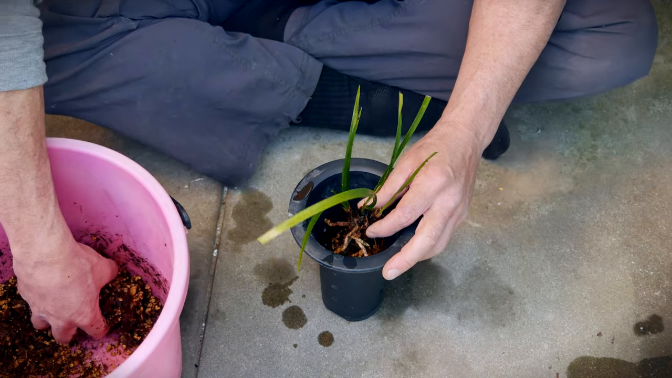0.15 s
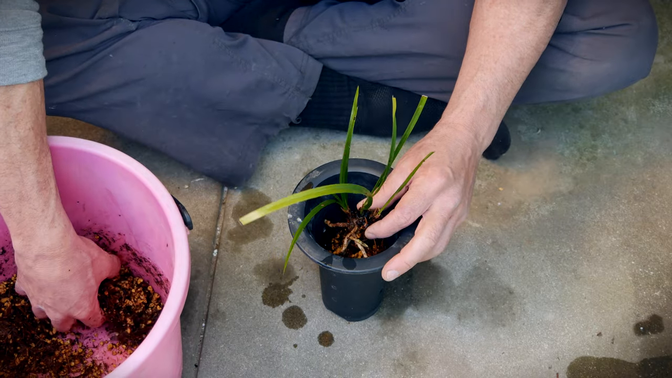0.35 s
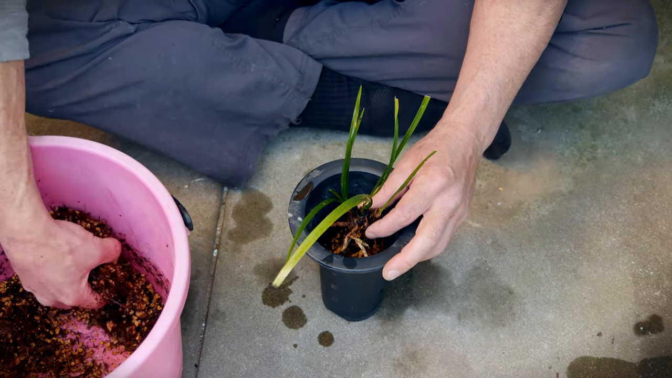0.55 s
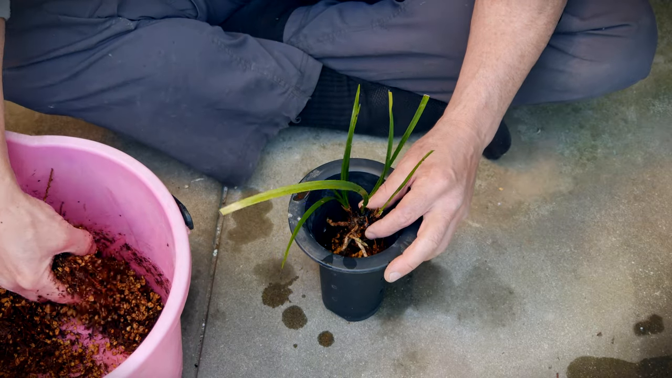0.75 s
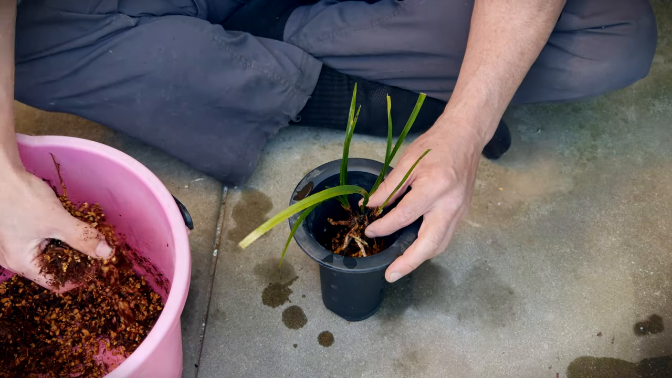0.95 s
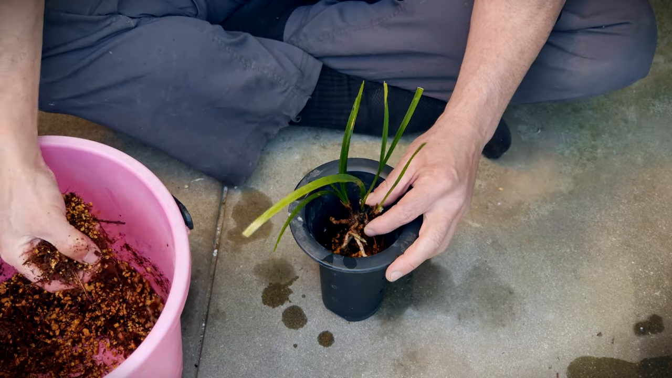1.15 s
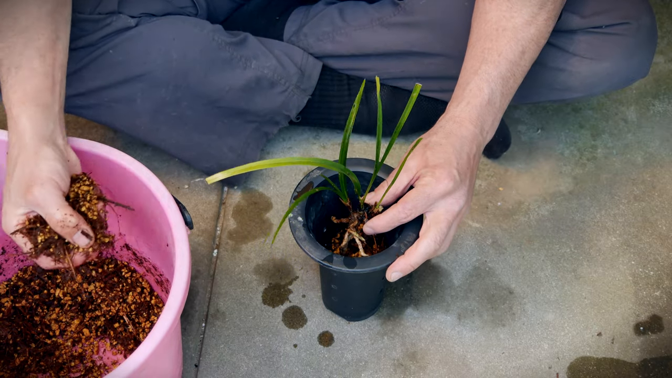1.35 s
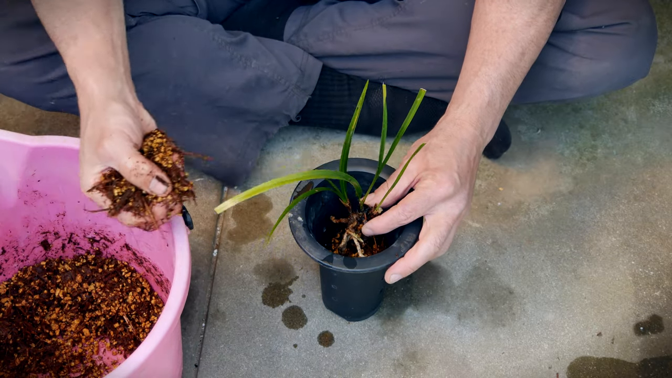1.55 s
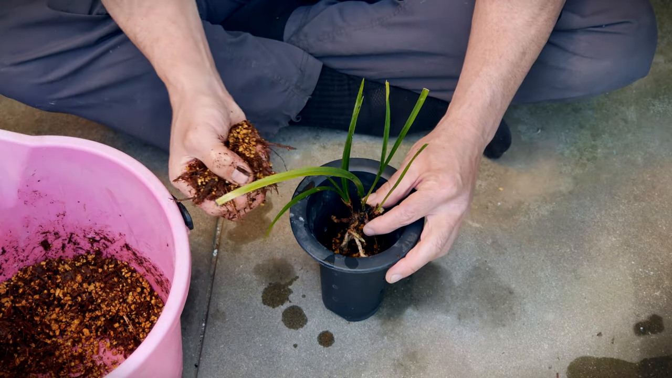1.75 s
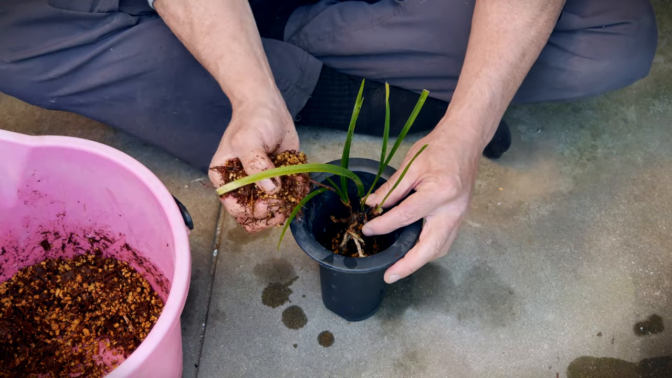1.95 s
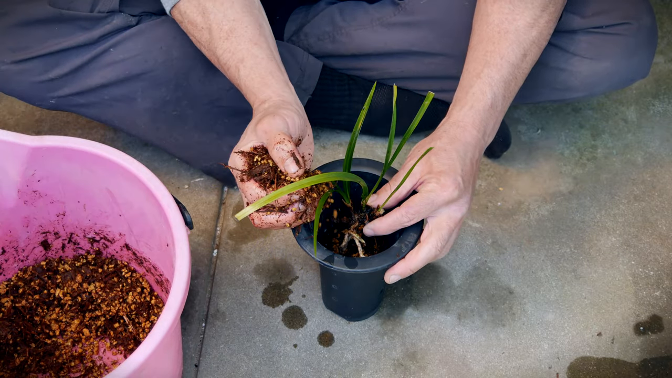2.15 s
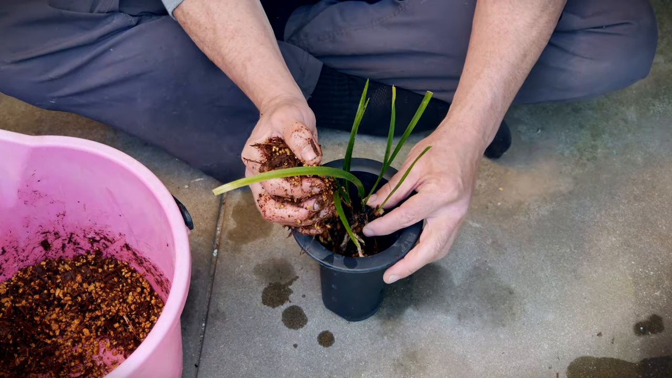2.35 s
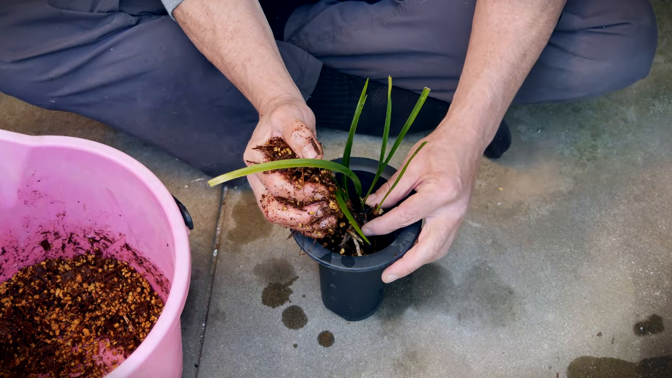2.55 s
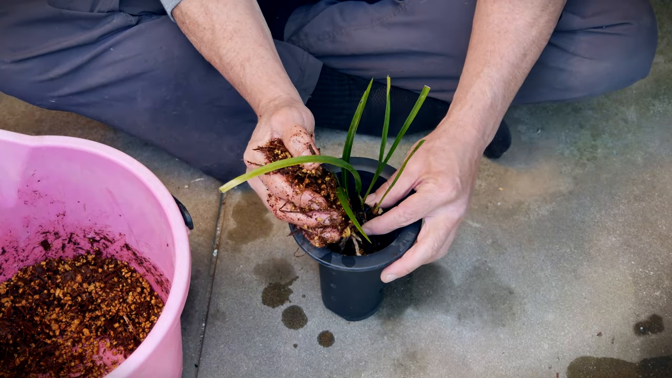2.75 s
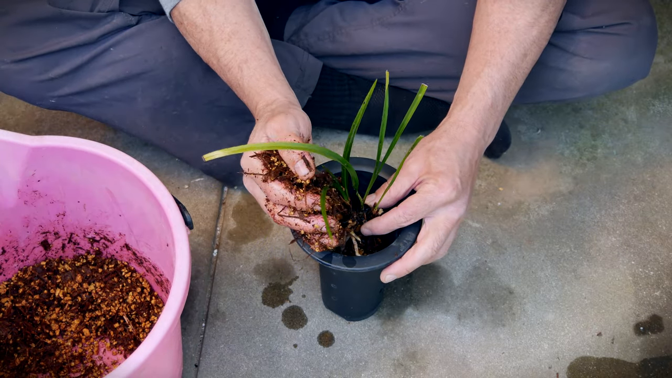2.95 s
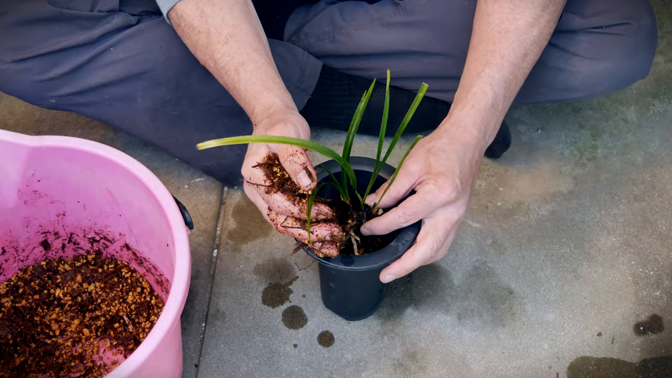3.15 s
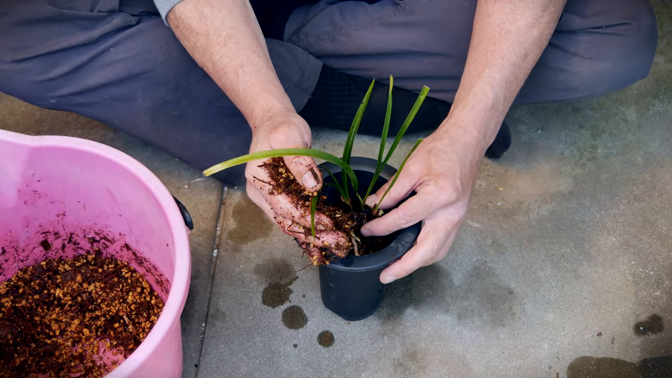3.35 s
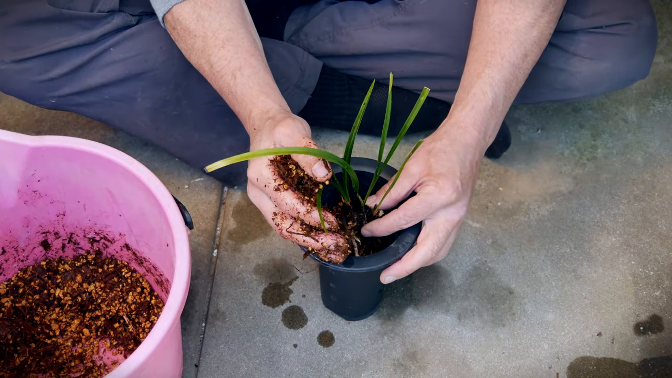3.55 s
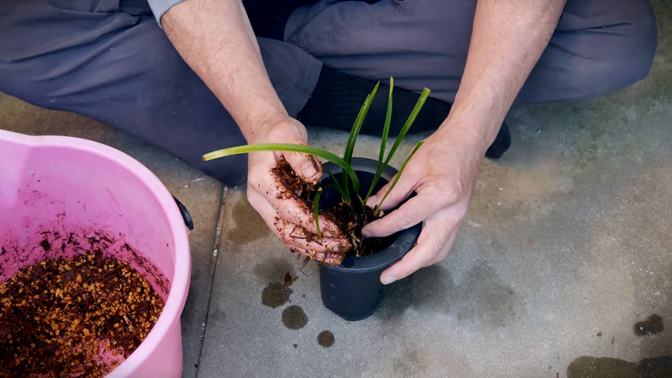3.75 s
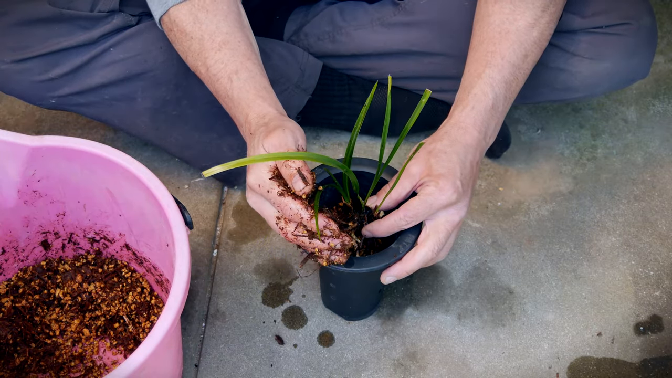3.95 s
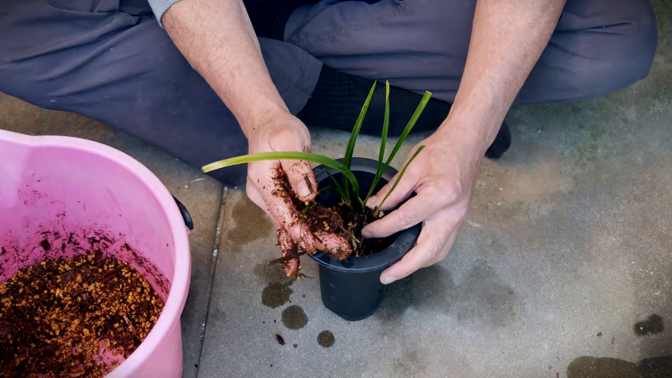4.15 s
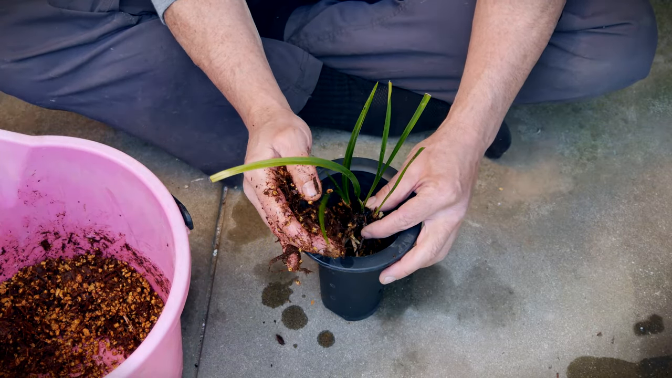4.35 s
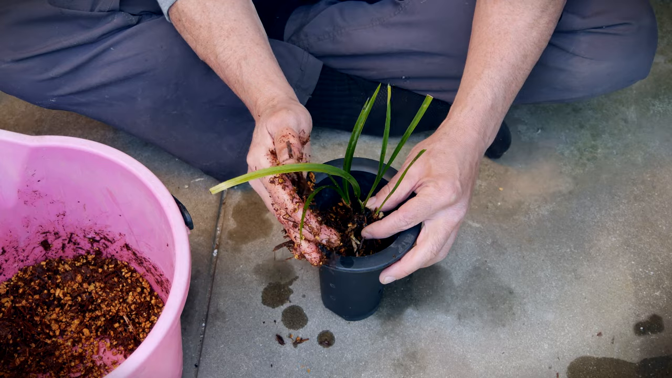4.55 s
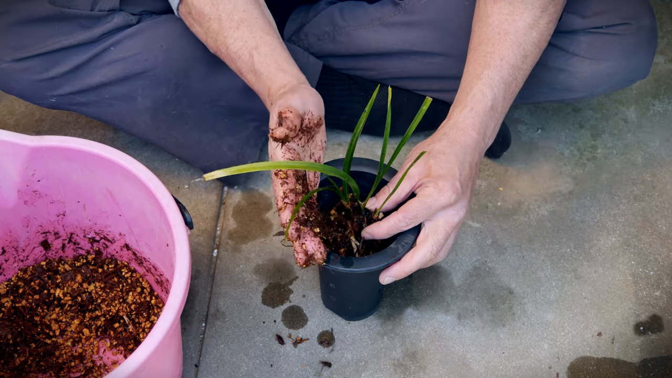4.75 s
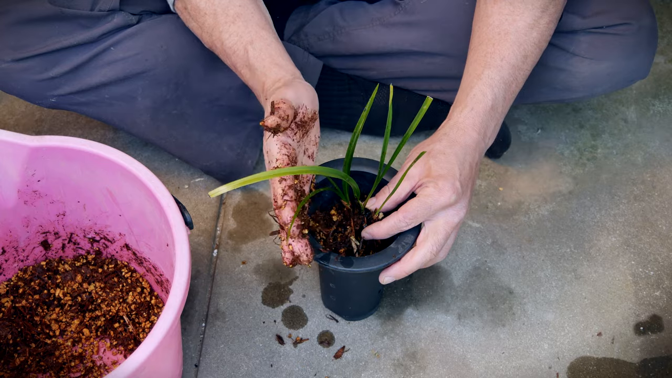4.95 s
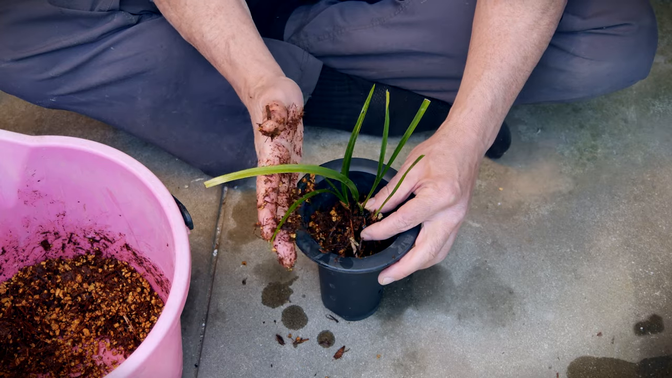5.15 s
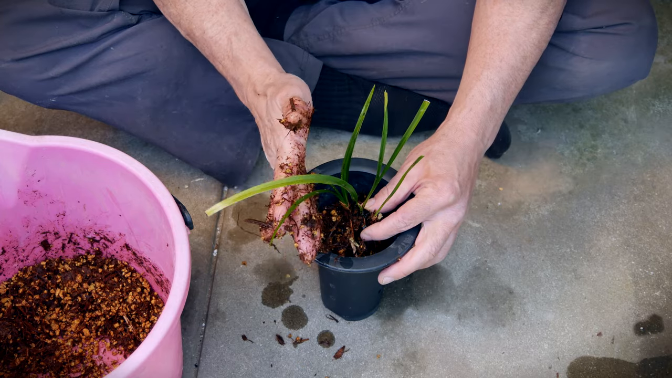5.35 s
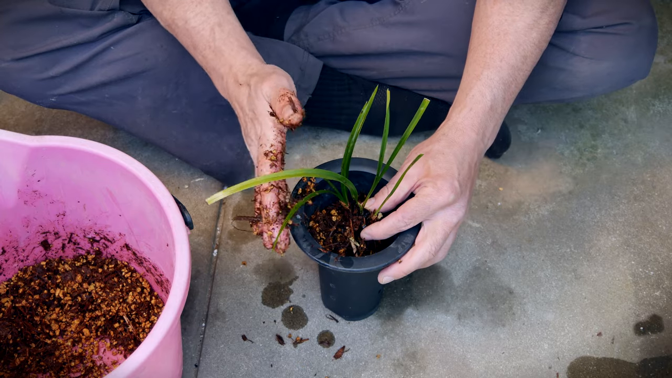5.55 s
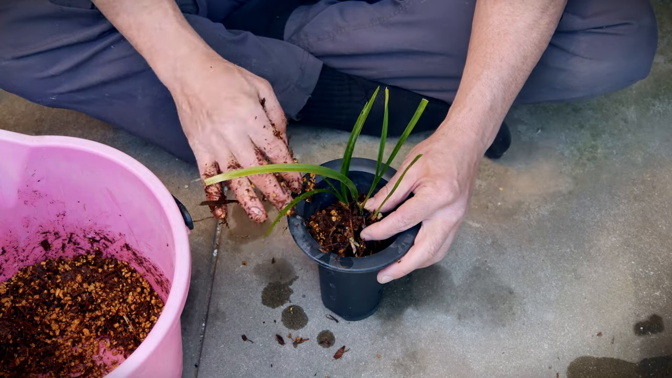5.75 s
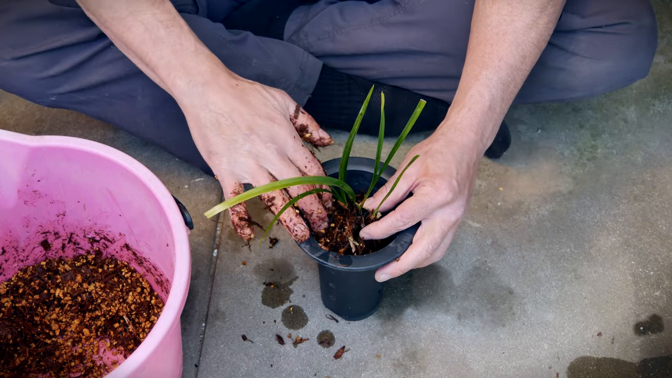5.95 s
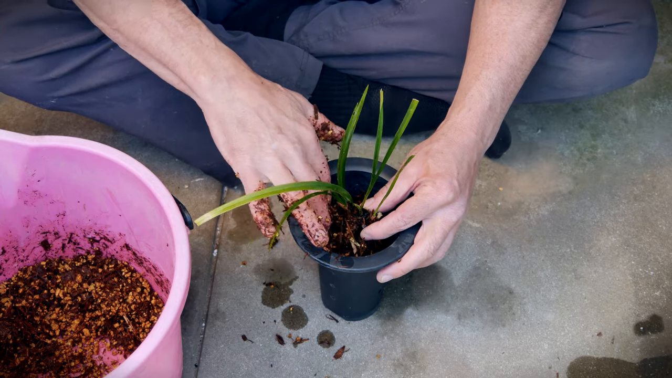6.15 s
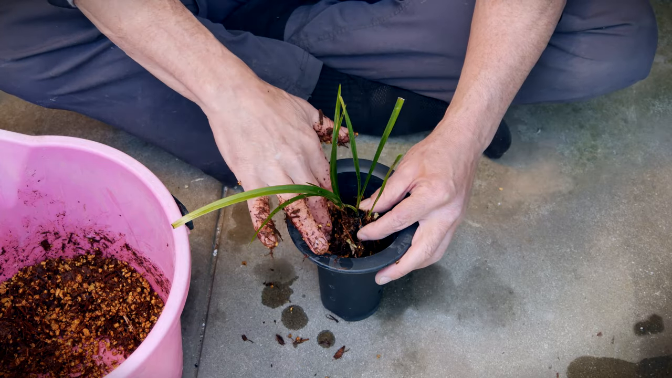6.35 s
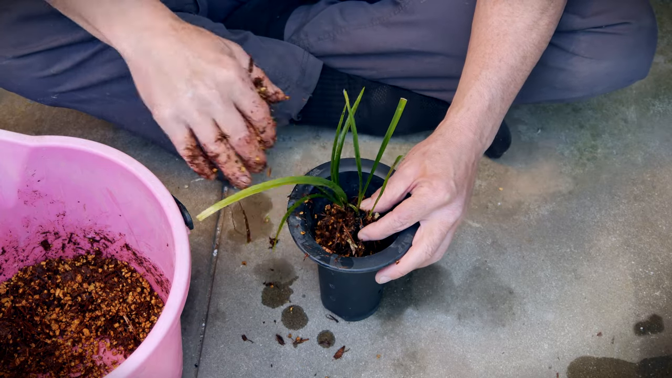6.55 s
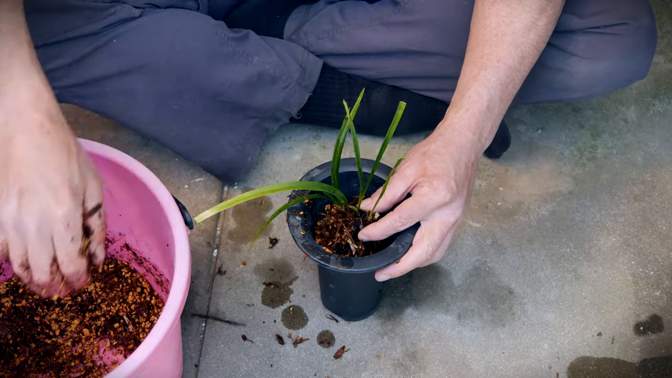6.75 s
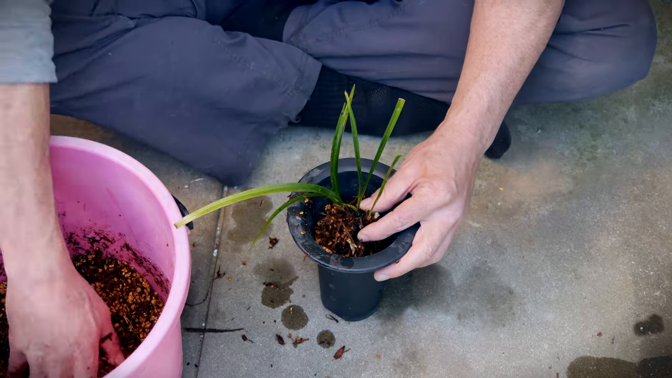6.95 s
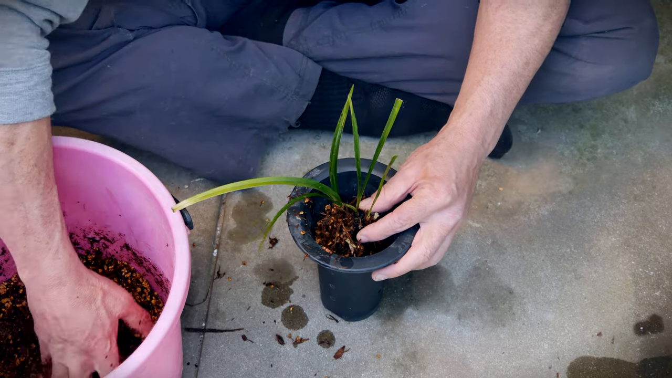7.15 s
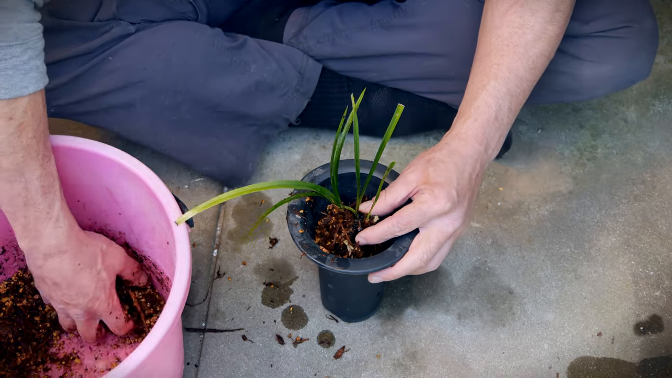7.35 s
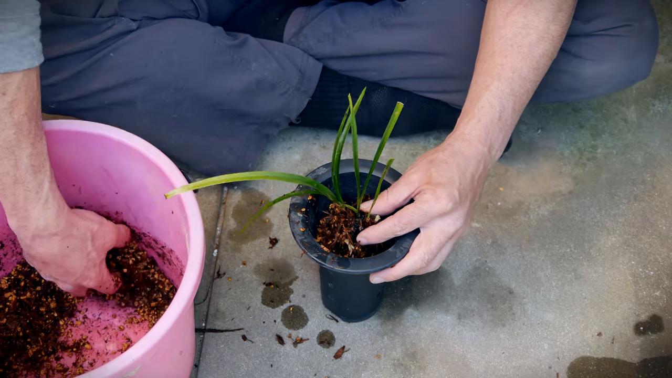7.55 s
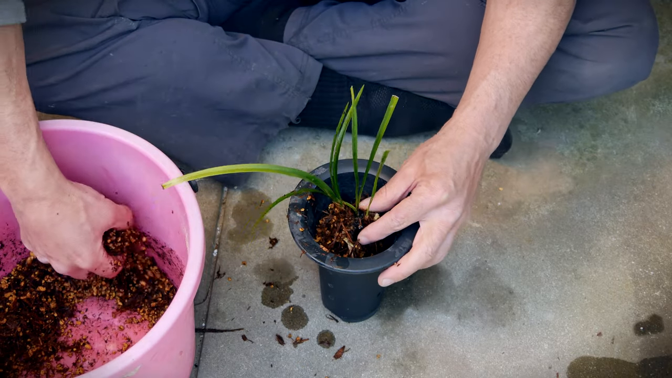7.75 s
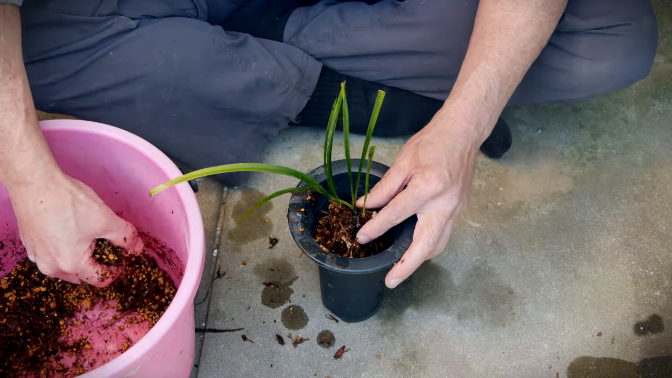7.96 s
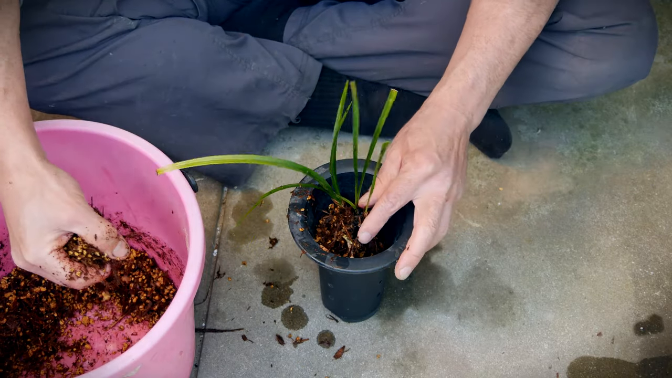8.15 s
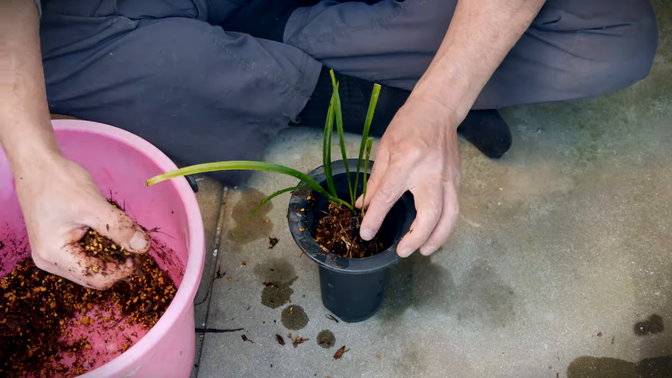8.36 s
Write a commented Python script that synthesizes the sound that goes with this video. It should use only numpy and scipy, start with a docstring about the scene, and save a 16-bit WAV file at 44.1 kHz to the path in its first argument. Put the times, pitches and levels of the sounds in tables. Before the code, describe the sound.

On an outdoor patio, heard closely in stereo, a hand digs in coarse potting mix in a plastic tub to the left. From 0 to about 1.6 seconds, short gritty pushes grind the grains, single pieces tick on plastic, and the wall gives small hollow knocks. From about 1.8, dry bark chips crackle brightly at a small pot in the centre, busiest between 2.3 and 3.3, with a sharp snap near 2.85. Two very faint, soft coos sound far off around 1.9 and 2.4. The crumbling thins to sparse ticks until 5.4. Between 5.7 and 6.5, soft leafy sweeps and a slight rim scuff pass. Around 7 the hand digs again, louder, with crunching scrapes and a strong hollow drum near 7.3, then smaller grinding pushes and rattles to 8.4. Faint low rumble and air continue throughout.

```python
"""Scooping potting mix into a small pot

Coarse mix is scooped by hand from a plastic tub and crumbled into a small pot, outdoors. Fingers push
through the grains, which rattle on the tub and make its wall drum; bark chips crackle at the pot. The hand
brushes past leaves, then digs again. Underneath lie a faint outdoor rumble and two far-off coos.
Clicks and noise, coloured by filters, make the grains and leaves; decaying sines make the wall."""
import sys
import numpy as np
from scipy import signal
from scipy.io import wavfile
from scipy.ndimage import uniform_filter1d

SR = 44100
rng = np.random.default_rng(int(sys.argv[2]) if len(sys.argv) > 2 else 0)


def wrap_up_sound(samples):
    """Save the sound to the file named by the first command line argument, as 16-bit audio."""
    columns = np.atleast_2d(samples).T
    # keep every value between -1 and 1, then stretch to whole-number steps
    tamed = np.clip(columns, -1, 1)
    steps = np.round(tamed * 32767).astype(np.int16)
    wavfile.write(sys.argv[1], SR, steps)


N = 370440
TIME = np.arange(N) / SR

FILTER_SIZE = 2048  # samples in a colouring filter and in a single grain
HZ = np.fft.rfftfreq(FILTER_SIZE, 1 / SR)
SPLIT_HZ = 4500  # where body ends and treble begins
CRISP_S = .0024  # how fast a grain's treble chatter dies

# The loudest single grains striking the tub.
# Each row: start in seconds, relative level in dB, ring in Hz, treble over body in dB.
TUB_GRAINS = [(0.0088, -43, 1370, -31), (0.0633, -47.5, 2110, 2), (0.1428, -44, 2130, -8),
              (0.1731, -30, 1970, -8), (0.185, -34, 1330, 1), (0.2106, -38, 1310, -10),
              (0.3062, -37.5, 1440, -7.5), (0.3759, -51, 3200, 17), (0.388, -48, 1420, 15),
              (0.4174, -41.5, 1900, -7), (0.5005, -45, 1850, -33), (0.6609, -46.5, 1260, -16),
              (0.7877, -51, 1690, -2), (0.8242, -32.5, 1380, -7.5), (0.8513, -43, 1430, -9),
              (0.92, -44, 1840, -30), (1.0061, -32, 1600, -27), (1.0412, -37, 1466, -3.5),
              (1.0718, -36.5, 1620, -11), (1.1068, -34, 1750, -15), (1.1169, -33.5, 3140, -9.5),
              (1.1569, -42, 1510, -7), (1.1883, -40, 2050, -3), (1.2042, -41, 1990, -5),
              (1.2449, -36.5, 2530, -12.5), (1.2964, -51.5, 2050, -6), (1.3859, -37.5, 1450, -21),
              (1.4606, -34.5, 1430, 0.5), (1.4711, -32, 2120, -5), (1.5953, -49, 2470, -4),
              (6.9963, -41, 1550, -25), (7.0491, -40, 3100, -2), (7.1214, -37.5, 1220, -29),
              (7.1365, -32.5, 2150, -8.5), (7.3404, -32.5, 1320, -36), (7.4034, -37, 1960, 1),
              (7.463, -40, 1260, -5), (7.4905, -30, 3180, -6), (7.494, -31, 1470, 0),
              (7.5599, -37, 1390, -8), (7.6328, -40.5, 1490, 0), (7.747, -43.5, 1730, -63),
              (7.8829, -49.5, 1574, -9), (7.9861, -49, 1720, -8), (8.0178, -47, 1370, -15),
              (8.0278, -32, 1420, -7.5), (8.1703, -32.5, 2060, -10.5), (8.2763, -30.5, 2140, -8),
              (8.3735, -40.5, 1570, -52)]
# The spectrum of grains on the tub. Each row: frequency in Hz, relative level in dB per Hz.
GRAIN = [(100, -30.5), (400, -7), (700, -3), (1100, -4), (1800, -2.5), (3000, -3.5), (4500, -7),
         (7000, -8.5), (10500, -7.5), (13000, -14.5), (16000, -25)]
# The tub stands to the left. Each row: frequency in Hz, left minus right in dB.
TUB_SIDE = [(100, 3.5), (300, 3), (700, 2.5), (2400, 4), (4400, 5.5), (8000, -0.5), (15000, 2)]
# How the hollow of the tub colours the grains in each scoop; it changes as the tub empties.
# Each row: frequency in Hz, width in Hz, boost in dB.
FIRST_HOLLOW = [(890, 180, 11), (1440, 150, 6), (1714, 110, 7.5), (1980, 93, 7), (3300, 500, -1)]
SECOND_HOLLOW = [(800, 500, 7.8), (1361, 470, 8.7), (2040, 130, 6), (2740, 93, 1.5), (3200, 150, 4.3)]
# Pushes of the fingers through the mix in the tub. Each row: start in seconds, hold in seconds,
# relative level in dB, treble over body in dB before trims, relative wall drumming in dB.
PUSHES = [(0.181, .028, -39.5, -8.5, -37), (0.232, 0.024, -48, -7, -62), (0.313, .018, -50.5, -9, -47),
          (0.418, .025, -40.5, -15, -44), (0.465, 0.061, -46, -29, -54), (0.543, 0.041, -42.5, -16, -51),
          (0.676, 0.017, -51.5, -18.5, -56), (0.745, 0.037, -56, -11, -54), (0.823, 0.1, -50.5, -17.5, -49),
          (1.065, .135, -42.5, -15, -53), (1.251, .025, -49, -13, -68), (1.348, 0.082, -61.5, -3.5, -70),
          (1.476, 0.014, -47, -8.5, -68), (7.06, 0.038, -44, -11, -38.5), (7.151, .185, -33.5, -12, -30.5),
          (7.384, 0.062, -39.5, -11, -38.5), (7.452, 0.12, -32.5, -11.5, -31), (7.61, .012, -45, -11, -48),
          (7.68, 0.06, -50.5, -21, -65), (7.839, 0.09, -53.5, -21, -57), (7.989, .125, -46, -22, -55),
          (8.186, 0.043, -52.5, -10, -70), (8.3, .04, -58, -6.5, -70)]
RETURN_S = 6.9  # the hand is back in the tub for its second scoop


def tub():
    """Everything that sounds in the tub, heard from the left: single grains, two scoops and the wall."""
    spot_db = read(GRAIN)
    spot_db = spot_db + bump(hz=1413, width_hz=160, db=6) + bump(hz=14000, width_hz=3000, db=-3.5)
    loose = strays([push[:4] for push in PUSHES], per_s=22, settle_s=.015, over_db=-2,
                   spread_db=5, low_hz=1280, high_hz=2180)
    rattle = strikes(TUB_GRAINS + loose, spot_db, chatter_s=0.0044, crisp_s=CRISP_S, snap=0.55,
                     ring_db=11.0, ring_width=0.27, dulling=0.25, heft=0.65)
    x = gain_of(-7.5) * rattle

    first = [push for push in PUSHES if push[0] < RETURN_S]
    second = [push for push in PUSHES if push[0] >= RETURN_S]
    x += clumps(depth_db=1.8, size=500) * scoop(
        first, FIRST_HOLLOW, per_s=2100, spread_db=4.5, rustle=0.63,
        patchy_db=3.0, body_db=-2.5, treble_db=-1)
    x += scoop(second, SECOND_HOLLOW, per_s=1700, spread_db=4, rustle=.45,
               patchy_db=1.5, body_db=-3.5, treble_db=-1.0)
    x += wall(drag_db=-7, thud_hz=104.5, thud_t60=0.031, favour_db=13, build_s=0.0023)

    left = colour(x[0], read(TUB_SIDE) / 2)
    right = colour(x[1], -read(TUB_SIDE) / 2)
    return np.array([left, right])


# Time for a push to build and to die by 20 dB (s); it grows harder as it goes (dB).
PUSH_ATTACK_S, PUSH_RELEASE_S, PUSH_SWELL_DB = 0.037, 0.056, 0.5


def scoop(rows, hollow, per_s, spread_db, rustle, patchy_db, body_db, treble_db):
    """Grains grind in the hollow of the tub: muffled deep in the mix, bright on bare plastic."""
    start, hold, db, bright_db, _ = np.transpose(rows)
    hollow_db = read(GRAIN) + sum(bump(*mode) for mode in hollow)
    body, treble = body_and_treble(grains(per_s, spread_db, rustle), hollow_db)
    # pushes with little treble lose some upper body too
    tilt = np.c_[start + hold / 2, .7 * np.minimum(bright_db + 11, 0)]
    body = shifting(body, patchy_db, tilt)
    shape = PUSH_ATTACK_S, PUSH_RELEASE_S, PUSH_SWELL_DB
    body_level = level(np.c_[start, hold, db + body_db], *shape)
    treble_level = level(np.c_[start, hold, db + bright_db + treble_db], *shape)
    return body * body_level + treble * treble_level


# Knuckles and lumps bumping the tub. Each row: start in seconds, wall ring in dB,
# frequency this spot favours in Hz, thud on the ground in dB.
KNOCKS = [(0.173, -33, 445, -55), (0.191, -33, 470, -55), (.206, -28.5, 426, -48), (0.217, -51, 300, -40),
          (0.306, -32.5, 950, -50), (0.32, -47, 400, -25), (.661, -34.5, 715, -55),
          (1.009, -36.5, 433, -50), (7.044, -31, 900, -35), (7.0471, -28.5, 330, -13.5),
          (7.092, -32.5, 300, -20), (7.2583, -24, 300, -53), (7.287, -16, 304, -34),
          (7.339, -28.5, 950, -55), (7.974, -45, 430, -29)]
# The ways the tub's wall can ring.
# Each row: frequency in Hz, relative level in dB, time to die by 60 dB in seconds.
WALL = [(308.5, -5.5, 0.086), (334, -11, 0.072), (424, -0.5, 0.037), (450, -4.5, 0.022), (605, 2, 0.021),
        (739, -17, 0.11), (895, -8.5, 0.047), (1124, -17, 0.063), (1206, -14, 0.033)]


def wall(drag_db, thud_hz, thud_t60, favour_db, build_s):
    """The tub's wall rings under dragged grains and knuckles; a hard bump also thuds on the ground."""
    t = np.arange(SR // 4) / SR
    onset = 1 - np.exp(-t / build_s)  # flesh makes a soft contact

    def ring(spot_hz):
        """Modes near the one that the spot favours ring most."""
        modes = np.zeros(len(t))
        for hz, db, t60 in WALL:
            mode_db = db - favour_db * abs(np.log2(hz / spot_hz)) - 60 * t / t60
            modes += gain_of(mode_db) * np.sin(2 * np.pi * hz * t)
        modes *= onset
        return modes / abs(modes).max()

    drumming = [(start, hold, drum_db) for start, hold, *_, drum_db in PUSHES]
    pressure = level(drumming, attack_s=0.029, release_s=0.031, swell_db=-1.5)
    drag = grains(per_s=820, spread_db=2.0, rustle=0.52)[0] * pressure
    base = ring(spot_hz=348)
    drummed = signal.oaconvolve(drag, base / np.linalg.norm(base))[:N]
    out = np.tile(gain_of(drag_db) * drummed, (2, 1))

    thud = onset * gain_of(-60 * t / thud_t60) * np.sin(2 * np.pi * thud_hz * t)
    for s, ring_db, spot_hz, thud_db in KNOCKS:
        add(out, s, gain_of(ring_db) * ring(spot_hz) + gain_of(thud_db) * thud)
    return out


# The loudest chips snapping and dropping at the pot.
# Each row: start in seconds, relative level in dB, ring in Hz, treble over body in dB.
CRACKS = [(2.0498, -50.5, 2600, -6), (2.0988, -43.5, 4180, 8), (2.2878, -43, 7160, 5.5),
          (2.3483, -43.1, 2170, -3), (2.3709, -45, 9260, 10), (2.4062, -42.5, 2300, -1),
          (2.4295, -47.9, 2580, 2), (2.5363, -40, 7200, 9), (2.599, -45, 7520, 4), (2.6154, -39, 8150, 6),
          (2.6541, -34, 2530, 0), (2.6687, -40, 7150, 10), (2.7323, -50, 4220, 7), (2.7524, -47.5, 2780, 2),
          (2.8058, -40, 7100, 9), (2.8481, -45, 5940, 12), (2.8512, -29.5, 5900, 1.5),
          (2.8903, -41.5, 4520, 8), (2.9725, -46.5, 6800, 12), (3.0199, -48.5, 2930, 0),
          (3.0662, -41, 7300, 13), (3.0948, -49, 2890, 5), (3.1317, -41.5, 4670, 14),
          (3.2396, -45, 7320, 6), (3.2616, -41.5, 7700, 11), (3.411, -53.5, 6420, 10),
          (3.4615, -53.5, 3190, -12), (3.746, -48, 3810, -22), (3.8332, -47, 2710, -4),
          (3.9445, -45, 3470, -10), (4.0791, -56, 3320, -2), (4.2841, -52, 2050, 0),
          (4.4626, -54.5, 4890, 7), (4.5728, -46.5, 2590, 2), (4.7091, -53.5, 5170, 6),
          (4.7523, -48, 7800, 27), (4.8371, -54.5, 7650, 17), (5.4062, -35.5, 6500, 8.5),
          (6.4119, -53, 3660, 3), (6.5209, -59, 2480, -20), (6.7345, -56, 2000, 0)]
# The spectrum of dry chips. Each row: frequency in Hz, relative level in dB per Hz.
CHIP = [(200, -23), (900, -6.5), (1900, -7), (2600, 0.5), (4000, -1), (5500, -3.5), (7500, -2.5),
        (10000, -7), (13000, -14), (16000, -23.5)]
# Spills of mix as the fingers loosen. Each row: start in seconds, hold in seconds, relative level in dB.
SPILLS = [(1.77, 0.038, -68), (2.315, .08, -60), (2.549, .135, -56), (2.745, .05, -67), (2.979, 0.098, -57),
          (3.224, 0.024, -53.5), (3.409, 0.036, -65.5), (3.52, 0.026, -68.5), (3.698, 0.017, -63),
          (3.749, .025, -57.5), (4.05, .03, -68), (4.331, 0.1, -69.5), (4.738, .03, -73), (4.94, .012, -70),
          (5.23, .1, -75)]
SPILL_ATTACK_S, SPILL_RELEASE_S = 0.091, 0.08  # time for a spill to build and to die by 20 dB
CHIP_TREBLE_DB = 1  # treble over body of the small chips in a spill


def pot():
    """Dry chips crackle out of the hand and land in the pot, each with a colour of its own."""
    loose = strays([(*spill, CHIP_TREBLE_DB) for spill in SPILLS], per_s=32, settle_s=.012, over_db=7.5,
                   spread_db=2.5, low_hz=2500, high_hz=8000)
    cracks = strikes(CRACKS + loose, read(CHIP), chatter_s=0.0032, crisp_s=CRISP_S, snap=0.26,
                     ring_db=7.5, ring_width=0.1, dulling=0.22, heft=1.3)
    crumbs = evened(ports(grains(per_s=380, spread_db=5, rustle=.3), read(CHIP)))
    flow = level(SPILLS, SPILL_ATTACK_S, SPILL_RELEASE_S, swell_db=3.0)
    crumbs = shifting(crumbs, patchy_db=3, size=5, order=10)
    crumbs = crumbs * flow * clumps(depth_db=1.5, size=400)
    return gain_of(-8) * cracks + gain_of(1.0) * crumbs


# Spectra of leaves and of the pot's rim. Each row: frequency in Hz, relative level in dB per Hz.
LEAF = [(300, -7), (850, 6), (1500, -6.5), (2100, -3.5), (2700, 3), (4000, 1.5), (5000, -4), (6500, -1.5),
        (7300, -2.5), (8300, -5), (11000, -5.5), (15500, -16)]
RIM = [(300, -15), (600, -9), (850, 6), (1250, -7), (1750, -5), (2400, -5), (6000, -27)]
# Sweeps of hand and sleeve past the leaves, and fingers scuffing the rim of the pot meanwhile.
# Each row: start in seconds, hold in seconds, relative level in dB.
SWEEPS = [(5.69, 0.24, -56.5), (5.97, .1, -50), (6.17, 0.014, -53.5), (6.265, 0.045, -47),
          (6.41, 0.048, -62.5)]
SCUFFS = [(5.84, 0.029, -51.5), (5.97, 0.0081, -52)]


def brush():
    """Soft sliding friction: contacts so dense that they merge into a hiss; coarser on the rim."""
    hiss = evened(ports(grains(per_s=3000, spread_db=7.0, rustle=1.4), read(LEAF)))
    scuff = evened(ports(grains(per_s=280, spread_db=1.5, rustle=0.47), read(RIM)))
    sliding = level(SWEEPS, attack_s=0.05, release_s=0.051, swell_db=1.5)
    leaves = gain_of(-0.5) * shifting(hiss, patchy_db=1.4, size=90, order=3) * sliding
    return leaves + scuff * level(SCUFFS, attack_s=0.03, release_s=0.022)


def strikes(rows, spectrum_db, chatter_s, crisp_s, snap, ring_db, ring_width, dulling, heft):
    """Each grain hits once, chatters for a few milliseconds, and rings the spot it lands on."""
    out, t = np.zeros((2, N)), np.arange(FILTER_SIZE) / SR
    top_octaves = np.log2(np.maximum(HZ / 9000, 1))

    def contact(decay_s):
        """One snap and its dying chatter."""
        drive = rng.standard_normal((2, FILTER_SIZE)) * np.exp(-t / decay_s)
        drive[0, 0] = 0
        drive /= np.linalg.norm(drive, axis=1, keepdims=True)
        drive[0, 0] = snap
        drive[1] *= np.hypot(1, snap)
        return drive

    for s, db, hz, treble_db in rows:
        # a cushioned blow loses its upper body along with its treble
        soft_db = dulling * min(treble_db + 8, 0) * above(HZ, knee_hz=1920)
        # heavy grains stay in contact longer, which takes off the very top; light ones gain some
        heavy_db = -heft * (db + 42.0) * top_octaves
        tone_db = spectrum_db + soft_db + heavy_db + bump(hz, ring_width * hz, ring_db)
        body = body_and_treble(contact(chatter_s), tone_db)[0]
        treble = body_and_treble(contact(crisp_s), tone_db)[1]
        add(out, s, gain_of(db) * evened(body + gain_of(treble_db) * treble))
    return out


def grains(per_s, spread_db, rustle):
    """Countless tiny contacts of uneven size over a fine rustle."""
    hits = rng.exponential(1, N)
    size = gain_of(spread_db * np.minimum(hits, 3)) * (rng.random(N) < per_s / SR)
    clicks = evened(size * rng.choice([-1., 1.], (2, N)))
    chatter = np.exp(-np.arange(200) / 25)  # dies over 25 samples
    scuff_level = np.sqrt(abs(signal.oaconvolve(size ** 2, chatter)[:N]))
    scuff = scuff_level * rng.standard_normal((2, N))
    drive = clicks + evened(scuff) + rustle * rng.standard_normal((2, N))
    # the hand feeds energy steadily, however it is shared among the grains
    return drive / np.sqrt(uniform_filter1d(drive[0] ** 2, size=1500) + 1e-9)


def strays(gestures, per_s, settle_s, over_db, spread_db, low_hz, high_hz):
    """Grains knocked loose at random by gestures (start s, hold s, dB, treble dB), as rows for strikes."""
    rows, tries = [], 16
    for start, hold, db, treble_db in gestures:
        span = hold + settle_s
        for chance, when, size, spot in rng.random((tries, 4)):
            if chance * tries < per_s * span:
                grain_db = db + over_db - spread_db * size
                ring_hz = low_hz * (high_hz / low_hz) ** spot
                rows.append((start + when * span, grain_db, ring_hz, treble_db))
    return rows


def clumps(depth_db, size):
    """Gain that surges and stalls at random, over about size samples: the mix gives way in lumps."""
    wander = uniform_filter1d(rng.standard_normal(N), size=size)
    wander = evened(uniform_filter1d(wander, size=size))
    return evened(gain_of(depth_db * np.tanh(wander)))


# How quickly echoes die on the patio. Each row: frequency in Hz, time to die by 60 dB in seconds.
PATIO = [(200, 0.26), (1300, 0.11), (3500, 0.098), (9000, 0.13), (16000, 0.084)]


def patio(x, delay_s, wet_db):
    """Paving and nearby walls return a short scatter that dies at a different rate in each band."""
    t = np.arange(SR // 2) / SR
    echoes = rng.standard_normal((2, len(t))) * (rng.random((2, len(t))) < .1) * (t > delay_s)
    hz, age, z = signal.stft(echoes, SR, nperseg=256)
    decay = gain_of(-60 * age / read(PATIO, hz)[:, None])
    tail = signal.istft(z * decay, SR, nperseg=256)[1]
    tail = ports(tail, np.zeros(len(HZ)), AIR_LIKENESS)
    return gain_of(wet_db) * signal.fftconvolve(x, tail / np.linalg.norm(tail[0]), axes=1)[:, :N]


# Two faint far-off coos, perhaps a pigeon. Each row: start in seconds, hold in seconds, level in dB.
COOS = [(1.87, 0.1, -59), (2.38, 0.16, -60)]
COO_HZ = 425


def coos():
    """Two soft, pure hoots: one steady sine that swells twice."""
    return level(COOS, attack_s=.16, release_s=.15) * evened(np.sin(2 * np.pi * COO_HZ * TIME))


# The spectrum of the outdoor background. Each row: frequency in Hz, relative level in dB per Hz.
OUTDOORS = [(15, -1.5), (30, -1.5), (60, 0.5), (85, 4), (115, -1.5), (150, 0), (200, -5), (300, -7),
            (550, -15.5), (950, -16), (1500, -24), (2500, -29.5), (5000, -37.5), (10000, -38), (15500, -40)]
# How alike left and right are in the background and the echoes.
# Each row: frequency in Hz, likeness (1 is identical).
AIR_LIKENESS = [(60, 0.74), (300, 0.47), (1400, 0.57), (4000, 0.12), (15000, 0.061)]


def outdoors():
    """Distant rumble and faint air hiss: coloured noise, swelling a little with slow sines."""
    air = evened(ports(rng.standard_normal((2, N)), read(OUTDOORS), AIR_LIKENESS))
    slow_hz = np.geomspace(.3, 4, num=10)
    swell = evened(sum(np.sin(2 * np.pi * (f * TIME + rng.random())) for f in slow_hz))
    return air * gain_of(-48.0 + .5 * swell) * gain_of([[-.8], [.8]])  # a little louder on the right


def gain_of(db):
    """Decibels to amplitude."""
    return 10 ** (np.asarray(db) / 20)


def evened(x):
    """Scales to an rms (average strength) of 1."""
    return x / np.sqrt(np.mean(x ** 2) + 1e-20)


def read(points, hz=HZ):
    """Reads a table of values by frequency, joining its points on a log-frequency axis."""
    f, value = np.transpose(points)
    return np.interp(np.log(hz + 1), np.log(f + 1), value)


def level(rows, attack_s, release_s, swell_db=0):
    """Gain over time from gestures (start s, hold s, dB): each builds, swells while held, and dies away."""
    t = TIME[::32]
    power = np.zeros(len(t))
    for start, hold, db in rows:
        early, late = np.maximum(start - t, 0), np.maximum(t - start - hold, 0)
        progress = np.clip((t - start) / hold, 0, 1)
        fade_db = 20 * (early / attack_s + late / release_s)
        power += gain_of(db + swell_db * (progress - .5) - fade_db) ** 2
    return np.interp(TIME, t, np.sqrt(power))


def add(mix, s, sound):
    """Mixes a sound in at time s."""
    part = mix[:, max(round(s * SR), 0):][:, :sound.shape[-1]]
    part += sound[..., :part.shape[1]]


def bump(hz, width_hz, db):
    """A resonance as a hump in dB."""
    return db / (1 + (2 * (HZ - hz) / width_hz) ** 2)


def above(hz, knee_hz):
    """Octaves above a knee, levelling off at the split."""
    return np.clip(np.log2((hz + 1) / knee_hz), 0, np.log2(SPLIT_HZ / knee_hz))


def colour(x, db):
    """Causal (minimum-phase) filter with the gain db over HZ: it rings after a click, never before."""
    log_gain = np.log(gain_of(np.maximum(db, -100)))
    circle = np.concatenate([log_gain, log_gain[-2:0:-1]])
    taps = np.fft.ifft(np.exp(np.conj(signal.hilbert(circle)))).real
    return signal.oaconvolve(x, taps)[:len(x)]


# How alike left and right are for the nearby sounds.
# Each row: frequency in Hz, likeness (1 is identical).
NEAR_LIKENESS = [(60, 0.69), (1400, 0.92), (3100, 0.97), (7000, 0.7), (15000, 0.41)]


def ports(pair, db, likeness=NEAR_LIKENESS):
    """Colours a common and a differing drive into left and right."""
    same = np.clip(read(likeness), -.99, .99)
    mid = colour(pair[0], db)
    side = colour(pair[1], db + 10 * np.log10((1 - same) / (1 + same)))
    return np.array([mid + side, mid - side])


def body_and_treble(pair, db):
    """The sound below and above the split, each at rms 1."""
    steep = (HZ / SPLIT_HZ) ** 8 + 1e-12
    low_db = db - 10 * np.log10(1 + steep)
    high_db = low_db + 10 * np.log10(steep)
    return evened(ports(pair, low_db)), evened(ports(pair, high_db))


def shifting(x, patchy_db, tilt=None, size=28, order=2):
    """Random colour in patches of size frames by order bins; tilt rows (s, dB an octave) darken it."""
    hz, t, z = signal.stft(x, SR, nperseg=256, noverlap=192)
    patches = rng.standard_normal(z.shape[1:])
    patches = uniform_filter1d(patches, size=size, axis=1)
    patches = evened(uniform_filter1d(patches, size=order, axis=0))
    db = patchy_db * patches
    if tilt is not None:
        db = db + above(hz, knee_hz=1800)[:, None] * np.interp(t, *np.transpose(tilt))
    return signal.istft(z * gain_of(db), SR, nperseg=256, noverlap=192)[1][:, :N]


def scene():
    """Tub, pot and hand with their reflections, over the outdoor background."""
    near = tub() + pot() + brush()
    return near + patio(near, delay_s=0.0074, wet_db=-13.0) + outdoors() + coos()


EDGE_HZ = 15700  # the highest treble let through


def record(dry):
    """A low-pass filter removes the treble above the edge."""
    lowpass = signal.firwin(255, EDGE_HZ, window=("kaiser", 9), fs=SR)
    return signal.oaconvolve(dry, lowpass[None], "same")


dry = scene()
out = record(dry)
wrap_up_sound(out)
```